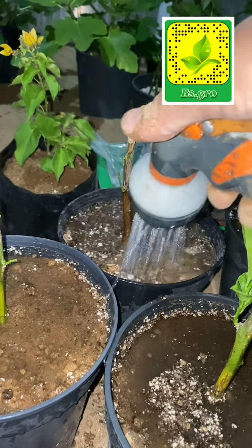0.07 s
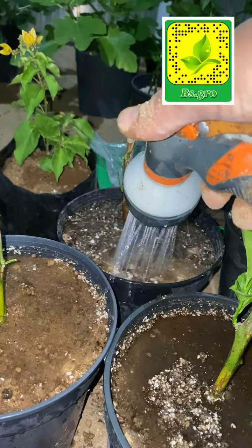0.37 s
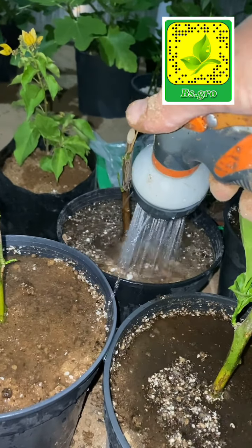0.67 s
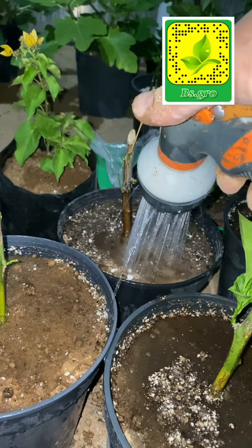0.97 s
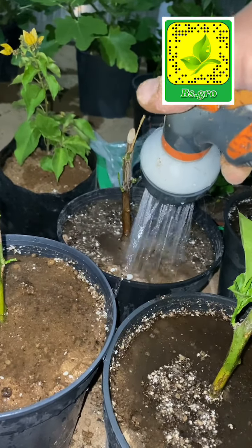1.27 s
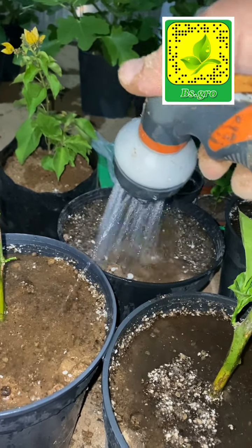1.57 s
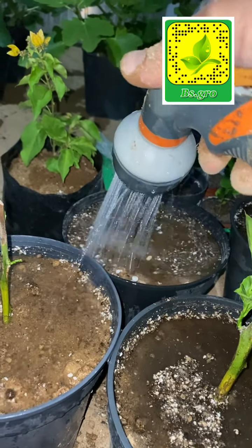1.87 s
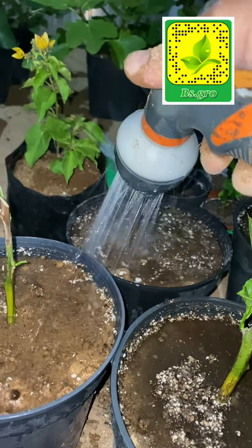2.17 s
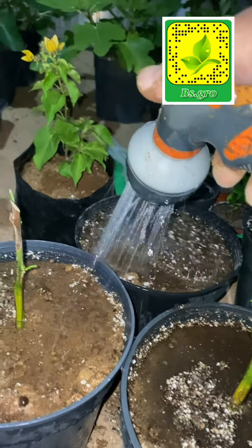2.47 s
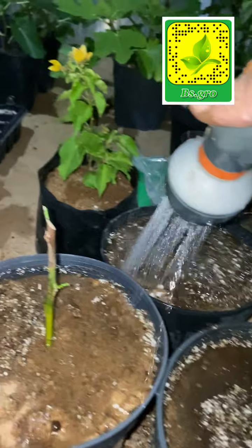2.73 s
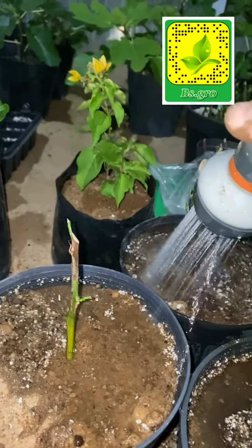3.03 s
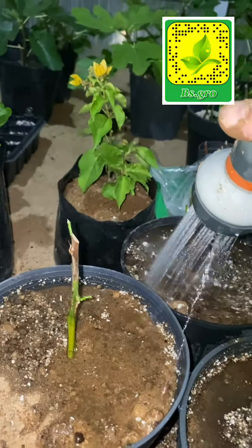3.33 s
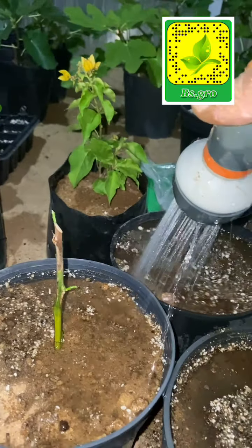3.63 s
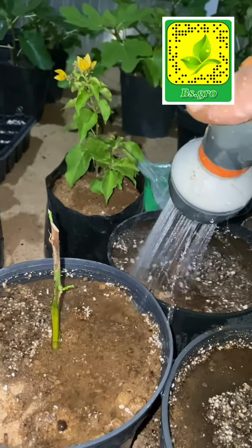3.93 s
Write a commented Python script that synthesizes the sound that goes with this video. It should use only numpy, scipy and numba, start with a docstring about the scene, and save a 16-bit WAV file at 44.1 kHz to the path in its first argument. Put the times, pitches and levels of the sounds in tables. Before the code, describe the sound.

Water sprays from a hand-held nozzle onto the soil of a plant pot, close by. The fizzing patter turns splashier and bubbly as water pools, with sharp droplet ticks. A motor hums faintly in a quiet room.

```python
"""Fine jets from a hand-held spray nozzle drum on the soil of a plant pot, close by.
Their impacts excite resonances of the soil and the hollow pot; as water pools, they splash and set
small bubbles ringing instead. Spray crackles in little bursts, and single droplets tick sharply.
A motor hums steadily in the background of a quiet room."""
import sys
import numpy as np
from scipy import signal
from scipy.fft import rfft, irfft
from scipy.io import wavfile
from scipy.ndimage import uniform_filter1d
from numba import njit

SR = 44100
rng = np.random.default_rng(int(sys.argv[2]) if len(sys.argv) > 2 else 0)


def digitize_waveform(pressure):
    """Quantize a signal to 16-bit integers and store it at the path in sys.argv[1].

    Rows of a 2-D input are taken as channels; values are limited to [-1, 1].
    """
    field = np.atleast_2d(pressure).T
    bounded = np.clip(field, -1, 1)
    quanta = np.round(bounded * 32767).astype(np.int16)
    wavfile.write(sys.argv[1], SR, quanta)


N = 176400

# Strength of the spray. Each row: time in seconds, crackle level in dB, fizz level in dB.
SPRAY_LEVELS = [(0, -43.5, -32), (.06, -44, -36), (.11, -49, -39), (.22, -47.5, -37.5), (.35, -44.5, -34.5),
                (.47, -45.5, -36), (.6, -41.5, -34.5), (.72, -44, -33.5), (.95, -41, -34),
                (1.1, -42.5, -34), (1.3, -39, -34), (1.45, -39.5, -38.5), (1.7, -41, -37.5),
                (1.9, -39.5, -36), (2.1, -41, -36.5), (2.35, -40, -33), (2.62, -39, -38.5),
                (2.85, -39.5, -35.5), (3.12, -39.5, -37.5), (3.32, -38.5, -34), (3.42, -41.5, -37.5),
                (3.6, -39, -36.5), (3.8, -41, -36), (4, -39, -36)]
JET_SPREAD_DB = 3.5  # mean level of a jet's drops above the weakest


def undb(db):
    """Amplitude grows tenfold for every 20 dB."""
    return 10 ** (np.asarray(db) / 20)


def unit(x):
    """Normalisation to an rms of 1."""
    return x / np.sqrt(np.mean(x ** 2))


def curve(rows, column=1):
    """An amplitude envelope, interpolated in dB between points in time."""
    rows = np.array(rows)
    return undb(np.interp(np.arange(N) / SR, rows[:, 0], rows[:, column]))


def walk(rate_hz):
    """Random modulation: straight ramps between Gaussian values; rms 1."""
    step = int(SR / rate_hz)
    held = np.repeat(rng.standard_normal(N // step + 1), step)
    return unit(uniform_filter1d(held, step)[:N])


def add(out, start_s, sound):
    """Superposition: a sound adds to those already present."""
    start = int(start_s * SR)
    out[start:start + len(sound)] += sound[:max(N - start, 0)]


def colour(x, points):
    """Minimum-phase filtering shapes the spectrum through (Hz, dB) points; rms 1."""
    hz, db = np.array(points).T
    bins_hz = np.maximum(np.arange(N // 2 + 1) * SR / N, 1)
    gain = undb(np.interp(np.log(bins_hz), np.log(hz), db))
    cepstrum = irfft(np.log(gain), N)
    cepstrum[1:N // 2] *= 2  # folding the cepstrum makes the filter causal
    cepstrum[N // 2 + 1:] = 0
    return unit(irfft(rfft(x) * np.exp(rfft(cepstrum)), N))


@njit
def bandpass(x, hz, width_hz):
    """A state-variable resonator with unit gain at its moving centre frequency."""
    y, band_state, low_state = np.empty(len(x)), 0., 0.
    for i in range(len(x)):
        g, damping = np.tan(np.pi * hz[i] / SR), width_hz / hz[i]
        band = (band_state + g * (x[i] - low_state)) / (1 + g * (g + damping))
        band_state = 2 * band - band_state
        low_state += 2 * g * band
        y[i] = damping * band
    return y


def background():
    """A motor's steady partials add to low-pitched room noise."""
    # Motor partials. Each row: frequency in Hz, rms level in dB.
    partials = [(89.1, -59.5), (163.5, -69), (178.2, -73)]
    # Room noise spectrum. Each row: frequency in Hz, relative density in dB.
    room_spectrum = [(25, -45), (34, -49), (43, -8), (65, 1.5), (110, 2), (150, -1.5), (200, -1.5),
                     (260, -5), (320, -4.5), (410, -10.5), (520, -6.5), (900, -3.5), (3000, -45.5)]
    t = np.arange(N) / SR
    hum = sum(undb(db) * np.sqrt(2) * np.sin(2 * np.pi * (hz * t + rng.random())) for hz, db in partials)
    return hum + undb(-59.5) * colour(rng.standard_normal(N), room_spectrum)


def snap(hz, decay_s):
    """A bursting droplet is a heavily damped oscillation; its envelope peaks at 1."""
    t = np.arange(SR // 200) / SR
    age = 2 * t / decay_s
    return age * np.exp(1 - age) * np.sin(2 * np.pi * hz * t)


def ticks():
    """Droplet transients: sharp snaps trail a brief spatter, and small ones prickle throughout."""
    # The sharpest droplets. Each row: start in seconds, peak level in dB, pitch in Hz.
    droplets = [(.3348, -18, 12300), (.3545, -20, 12900), (.9424, -20, 13200), (1.0348, -19.5, 12800),
                (1.2916, -15, 13400), (1.545, -20, 13100), (1.9805, -11, 12850), (2.1467, -20, 12400),
                (2.181, -19, 12200), (2.5663, -21, 8660), (2.6270, -17, 12000), (2.8497, -21, 8900),
                (3.0094, -21, 11150), (3.336, -22, 8650), (3.5980, -20.5, 9700), (3.633, -23, 9400),
                (3.8420, -18.5, 12900)]
    snap_s, tail_s, tail_db = .00027, .0014, -15
    prickles_per_s, low_hz, high_hz = 170, 6840, 13900
    out, prickle, t = np.zeros(N), np.zeros(N), np.arange(SR // 50) / SR
    tail = np.exp(-t / tail_s) * (1 - np.exp(-t / snap_s))
    for start, db, hz in droplets:
        spatter = unit(uniform_filter1d(rng.standard_normal(len(t)), size=9)) * tail
        add(out, start, undb(db) * snap(hz, snap_s))
        add(out, start, undb(db + tail_db) * spatter * np.sin(2 * np.pi * hz * t))
    for when, pitch, weakness in rng.random((int(prickles_per_s * N / SR), 3)):
        hz = low_hz + np.sqrt(pitch) * (high_hz - low_hz)
        above_crackle_db = 14.5 - 11 * np.sqrt(weakness)
        add(prickle, when * N / SR, undb(above_crackle_db) * snap(hz, decay_s=.00071))
    return out + prickle * curve(SPRAY_LEVELS)


def drops(per_s, spread_db):
    """Shot noise: independent impacts, many small and a few large."""
    lands = rng.random(N) < per_s / SR
    level_db = spread_db * np.minimum(rng.exponential(size=N), 6.1)
    return lands * undb(level_db) * rng.choice([-1, 1], N)


def scatter(impacts, decay_s=.00061, spatter_db=-6.5):
    """Each impact throws off spatter, a noise whose energy decays exponentially."""
    pole = np.exp(-2 / (decay_s * SR))
    energy = signal.lfilter([1 - pole], [1, -pole], impacts ** 2 + 1e-18)
    return impacts + undb(spatter_db) * np.sqrt(energy) * rng.standard_normal(N)


def splashes(drops_per_s=1800, edge_ratio=1.087):
    """Where the jets dig into a wet spot, narrow-band shot noise swells and fades."""
    # Splashes and gurgles. Each row: start and length in seconds, rms at the crest in dB, pitch in Hz.
    flurries = [(0.061, .3, -61, 1780), (.92, 0.048, -47, 4750), (1.006, 0.054, -47, 4950),
                (1.299, .07, -53.5, 1120), (1.434, 0.029, -51, 3250), (1.549, 0.25, -56, 1640),
                (1.93, .01, -42.5, 4500), (2.226, .04, -47, 3220), (2.457, 0.058, -47, 4800),
                (2.555, .03, -42, 7900), (2.708, 0.022, -39.5, 9000), (3.227, 0.027, -49.5, 1750)]
    out = np.zeros(N)
    for start, length, db, hz in flurries:
        swell = np.sqrt(np.hanning(int(length * SR)))
        band = signal.butter(2, [hz / edge_ratio, hz * edge_ratio], "bandpass", fs=SR, output="sos")
        flurry = signal.sosfilt(band, drops(drops_per_s, JET_SPREAD_DB))[:len(swell)]
        add(out, start, undb(db) * swell * unit(flurry))
    return out


def bubble(hz, decay_cycles=4.6, rise=.003):
    """A bubble is a damped oscillator whose pitch rises slightly as it rings."""
    samples = int(2 * np.pi * decay_cycles * SR / hz)
    age = np.arange(samples) * hz / SR / decay_cycles  # in decay times
    return np.exp(-age) * np.sin(2 * np.pi * decay_cycles * age * (1 + rise * age))


def bubbles(per_s=900, centre_hz=3483, spread_octaves=.194, spread_db=15.5):
    """Bubble resonance: the jets churn up a ringing froth, and a few bubbles stand out clearly."""
    # Strength of the froth. Each row: time in seconds, relative level in dB.
    froth_levels = [(0, -86), (.8, -59), (1.38, -60), (1.47, -53.5), (1.6, -50.5), (1.78, -52.5),
                    (1.95, -53), (2.24, -49.5), (2.42, -53), (2.65, -49.5), (2.86, -49), (3.0, -55),
                    (3.35, -49), (3.52, -53), (3.74, -46.5), (4, -51)]
    # The clearest bubbles. Each row: start in seconds, peak level in dB, pitch in Hz.
    clear_bubbles = [(0.0181, -28, 4870), (0.3728, -39, 2460), (.4255, -36, 4720), (0.5067, -36, 2660),
                     (.6287, -34, 4830), (1.2371, -31, 4880), (1.6182, -31, 3740), (1.6205, -32, 5050),
                     (2.4855, -36, 5000), (2.504, -34, 3850), (2.665, -39, 1150), (2.668, -45, 890),
                     (2.8311, -27.5, 3410), (2.8392, -34, 2300), (2.895, -43, 1170), (3.3443, -36, 3500),
                     (3.3726, -32, 3480), (3.8675, -31, 4600)]
    froth, pops = np.zeros(N), np.zeros(N)
    for when, up, down, weakness in rng.random((int(per_s * N / SR), 4)):
        hz = centre_hz * 2 ** (spread_octaves * (up - down))
        add(froth, when * N / SR, undb(-spread_db * np.sqrt(weakness)) * bubble(hz))
    for start, db, hz in clear_bubbles:
        add(pops, start, undb(db) * bubble(hz))
    return unit(froth) * curve(froth_levels) * undb(.5) + pops


def spray(burst_hz=151.7, shared=.1, pooled_s=1.4):
    """Modulated shot noise: fine droplets land in bursts, a crackle with a finer fizz above it."""
    # Spectra of the two layers. Each row: frequency in Hz, relative density in dB.
    crackle_spectrum = [(3000, -43), (5000, -23), (6300, -7.5), (6900, -0.5), (7300, 0), (7800, 0.5),
                        (9200, 2.5), (10500, -0.5), (12000, 0.5), (16000, -12)]
    fizz_spectrum = [(7000, -31.5), (10000, -19), (11500, -7.5), (12400, -6), (13200, -1.5), (14000, -7.5),
                     (15000, -21), (16000, -2)]
    common = walk(burst_hz)
    # Soil softens the larger drops until water pools.
    grain = np.interp(np.arange(N) / SR, [0, pooled_s], [.87, 1])

    def patter(spectrum, per_s, spread_db, burst_db):
        """Partly correlated bursts modulate the impacts, while the mean flow stays steady."""
        bursts = np.sqrt(shared) * common + np.sqrt(1 - shared) * walk(burst_hz)
        impacts = scatter(drops(per_s, spread_db * grain))
        x = colour(impacts * undb(burst_db * bursts), spectrum)
        return x / np.sqrt(uniform_filter1d(x ** 2, size=8000))

    crackle = patter(crackle_spectrum, per_s=8500, spread_db=3.5, burst_db=1.04)
    fizz = patter(fizz_spectrum, per_s=9000, spread_db=4, burst_db=1.27)
    return crackle * curve(SPRAY_LEVELS) + fizz * curve(SPRAY_LEVELS, column=2)


def drum(modes, drops_per_s=7500, wander_hz=9, wander_db=.5):
    """Modal excitation: each drop drives each resonance according to where it lands; rms 1."""
    impacts = scatter(drops(drops_per_s, JET_SPREAD_DB))
    out = 0
    for hz, width, db in modes:
        b, a = signal.iirpeak(hz, hz / (2 * width), fs=SR)
        gain = undb(db + wander_db * walk(wander_hz))  # swells and fades as the jets move about
        drive = impacts * rng.standard_normal(N)
        out = out + gain * signal.lfilter(b, a, signal.lfilter(b, a, drive))
    return unit(out)


def cancel(x, notches):
    """Destructive interference: reflections inside the pot cancel a few frequencies; rms 1."""
    for hz, width in notches:
        x = signal.lfilter(*signal.iirnotch(hz, hz / width, fs=SR), x)
    return unit(x)


def pot_wall(x):
    """Interference at the pot's wall carves spectral dips that shift and fill as the nozzle moves."""
    # Three moving dips. Each row: time in seconds, centre in Hz, gain in dB (a peak if positive).
    low_dip = [(0, 3080, -5), (.2, 3160, -14), (.45, 3000, -6), (1.3, 3000, -0.5), (1.7, 2720, -1.5),
               (2.8, 2750, -1.5)]
    high_dip = [(0, 5630, -0.5), (1.0, 5450, -3.5), (2.1, 5500, -4.5), (2.55, 5430, 0), (2.7, 4770, -3),
                (2.98, 4400, -17), (3.15, 4730, -3), (4, 5000, -3)]
    top_dip = [(0, 6060, -5), (1.0, 6200, 1), (2.4, 6500, -6), (2.8, 6300, 4)]
    t = np.arange(N) / SR
    for dip, width_hz in ((low_dip, 200.), (high_dip, 450.), (top_dip, 280.)):
        times, hz, _ = np.array(dip, float).T
        band = bandpass(x, np.interp(t, times, hz), width_hz)
        x = x - (1 - curve(dip, column=2)) * band
    return x


def jets():
    """Forced resonance: the jets drum on soil, splash in the growing puddle and make the pot thrum."""
    # Resonances. Each row: frequency in Hz, nominal width in Hz, relative level in dB.
    soil_modes = [(1590, 200, -12.5), (1850, 160, -6.5), (2470, 390, -2.5), (3690, 430, -1),
                  (4260, 290, -2.5), (4690, 490, -0.5), (5140, 410, 1), (5870, 350, -1), (6870, 500, -3.5)]
    puddle_modes = [(1570, 146, -2), (1810, 204, 0.5), (2243, 220, 1.5), (2860, 400, -1), (3360, 720, -1.5),
                    (4336, 270, 2), (5400, 790, -1), (6020, 320, -2.5), (6880, 520, -1.5)]
    thrum_modes = [(788, 274, 0), (1143, 267, 0)]
    # Cancellations inside the pot. Each row: frequency in Hz, width in Hz.
    soil_notches = [(2110, 220), (4030, 60)]
    puddle_notches = [(2030, 80), (4020, 64), (4850, 64)]
    # Strength of the jets on soil and in pooled water. Each row: time in seconds, level in dB.
    soil_levels = [(0, -46.5), (.1, -53), (.19, -55), (.28, -52), (.36, -48.5), (.6, -46.5), (.8, -47),
                   (.96, -46), (1.13, -46), (1.4, -46), (1.5, -46), (1.62, -47), (1.78, -51), (1.93, -51),
                   (2.1, -51), (2.35, -48.5), (2.5, -48.5), (2.7, -56), (3.0, -57), (3.4, -51), (4, -52)]
    puddle_levels = [(0, -61), (.2, -66), (.5, -60), (.9, -59), (1.33, -50.5), (1.5, -62), (1.6, -52),
                     (1.72, -49), (2.0, -46), (2.23, -48.5), (2.42, -48.5), (2.85, -46), (3.05, -44.5),
                     (3.25, -46), (3.55, -46), (3.72, -47), (4, -46)]
    # The pot's thrum. Each row: time in seconds, levels of the lower and upper resonance in dB.
    thrum_levels = [(0, -59.5, -62.5), (.25, -54.5, -58.5), (.55, -58, -62), (1.0, -58.5, -57),
                    (1.33, -58.5, -56), (1.45, -66.5, -60.5), (1.6, -63.5, -63.5), (1.85, -58.5, -57.5),
                    (2.1, -58.5, -56.5), (2.3, -60, -65), (2.65, -62, -59), (2.75, -61, -62),
                    (3.4, -65.5, -55.5), (3.7, -66, -63.5), (4, -68, -59.5)]
    soil = cancel(drum(soil_modes), soil_notches) * curve(soil_levels)
    puddle = cancel(drum(puddle_modes), puddle_notches) * curve(puddle_levels)
    thrum = sum(drum([mode]) * curve(thrum_levels, column) for column, mode in enumerate(thrum_modes, 1))
    return soil + puddle + thrum


def scene():
    """Water in the pot, heard from above, and the room superpose in one channel."""
    water = pot_wall(jets() + bubbles() + spray())
    return (water + splashes() + ticks() + background())[None]


def record(dry, cutoff_hz=15750):
    """An elliptic low-pass filter cuts the highest treble steeply."""
    return signal.sosfilt(signal.ellip(12, .1, 80, cutoff_hz, fs=SR, output="sos"), dry)


dry = scene()
out = record(dry)
digitize_waveform(out)
```